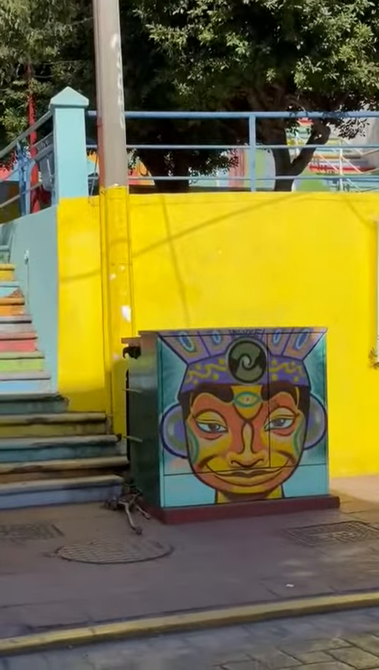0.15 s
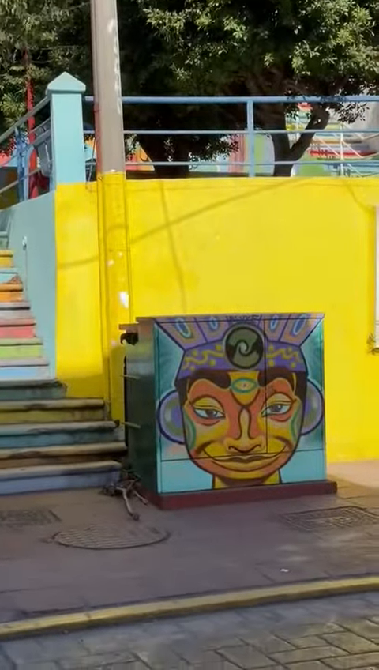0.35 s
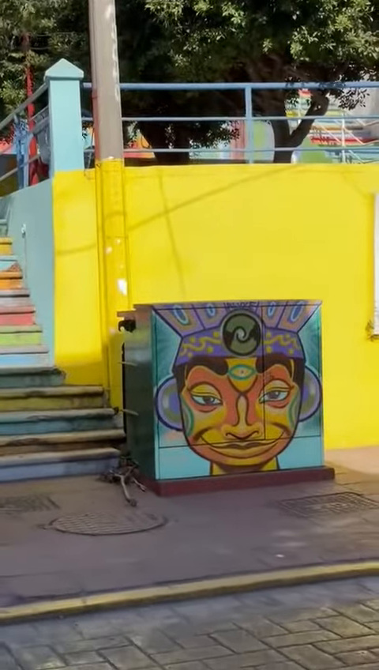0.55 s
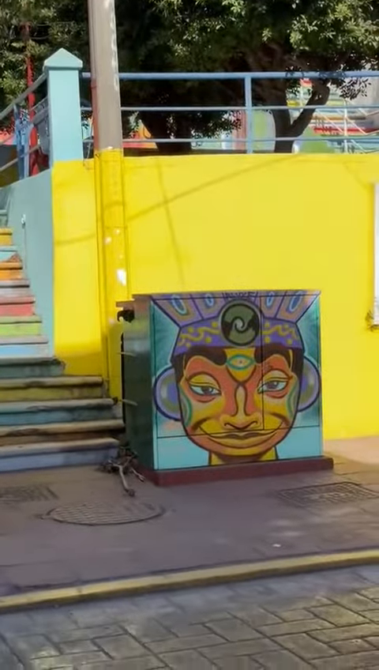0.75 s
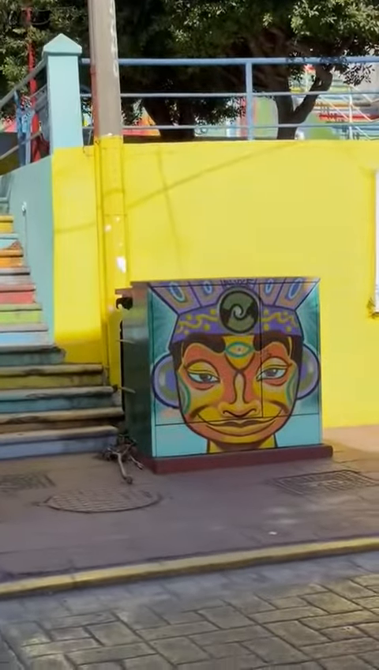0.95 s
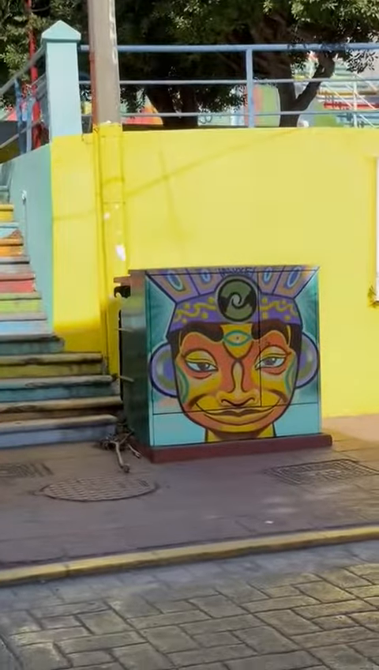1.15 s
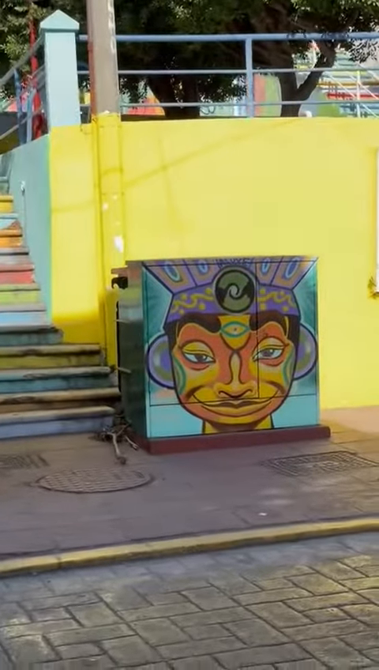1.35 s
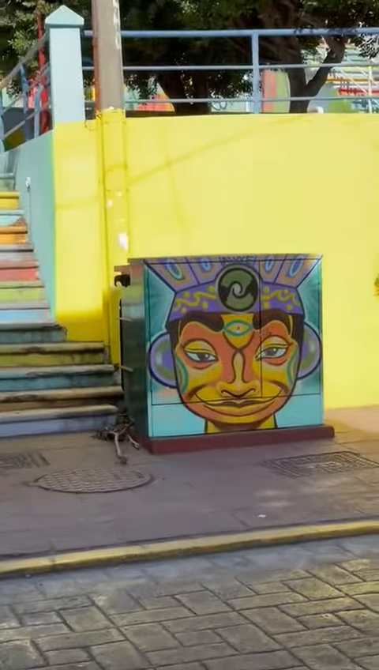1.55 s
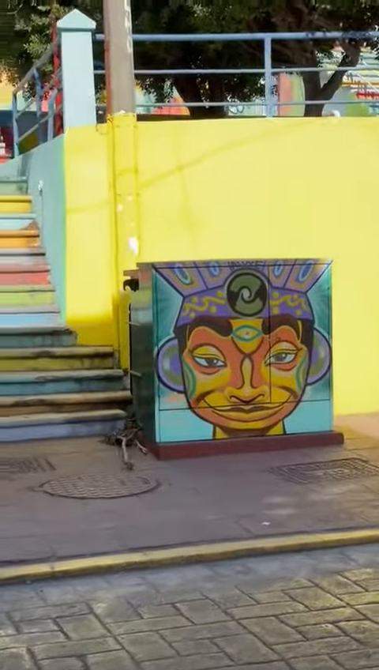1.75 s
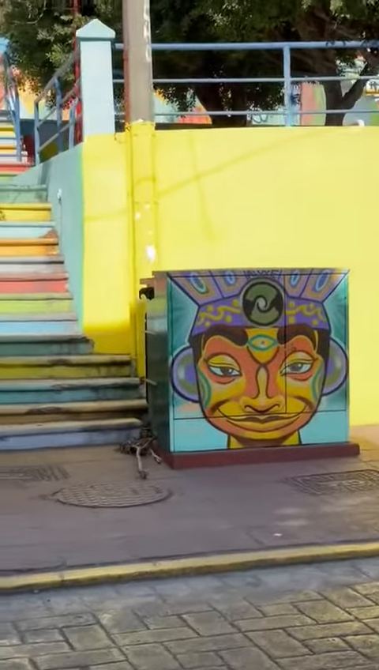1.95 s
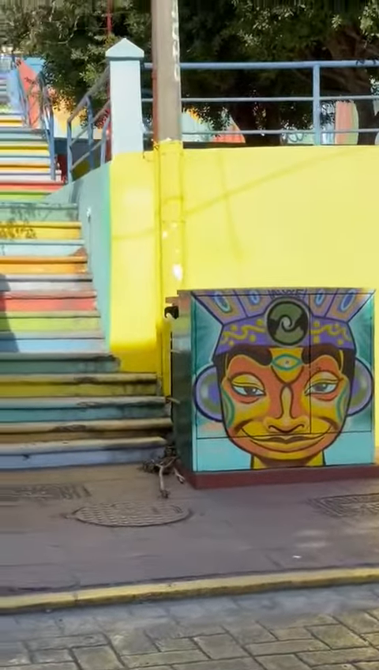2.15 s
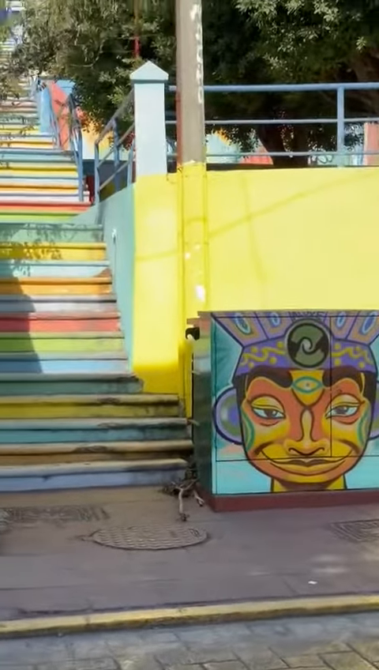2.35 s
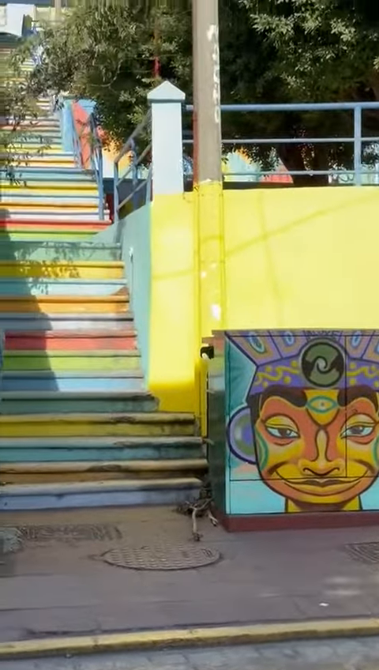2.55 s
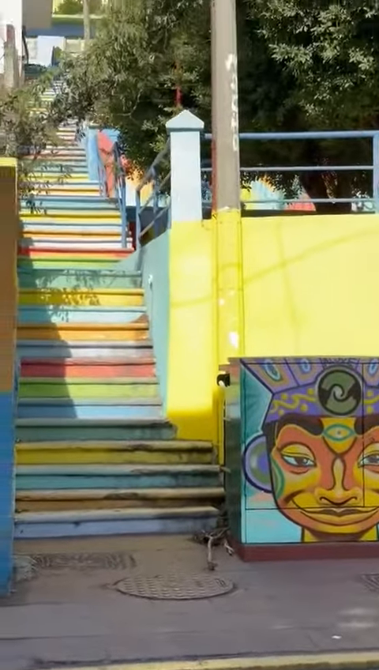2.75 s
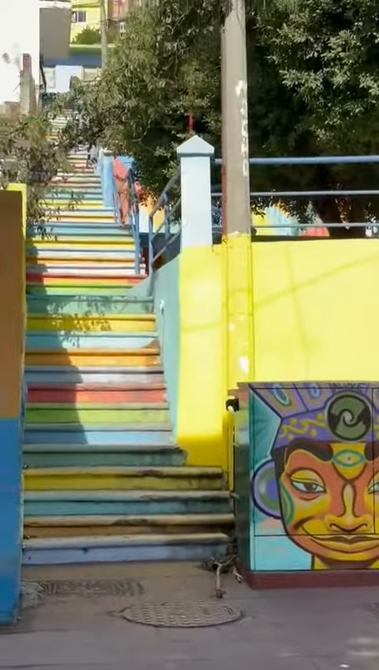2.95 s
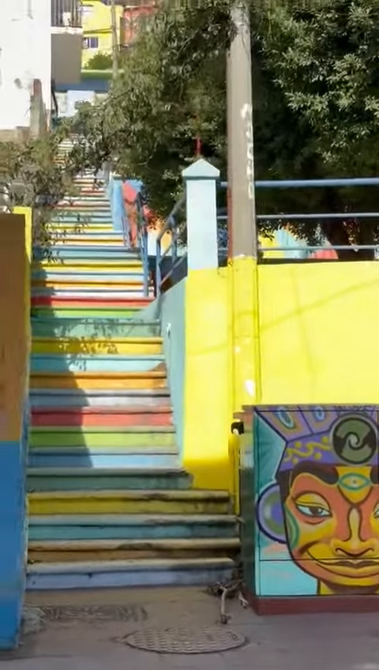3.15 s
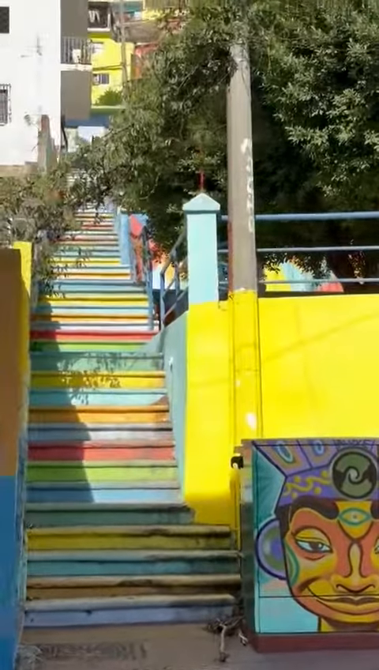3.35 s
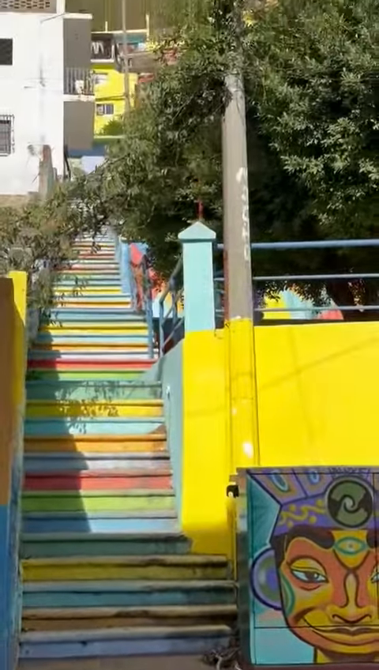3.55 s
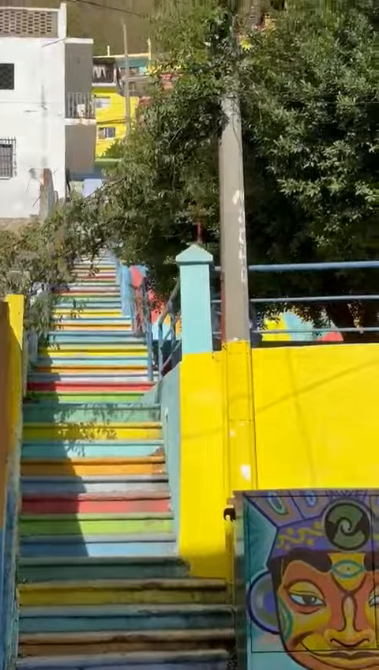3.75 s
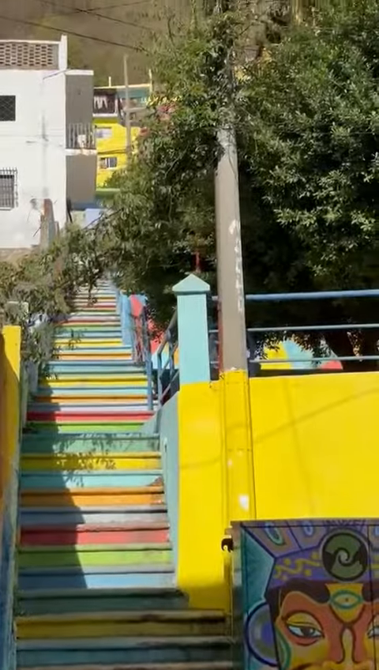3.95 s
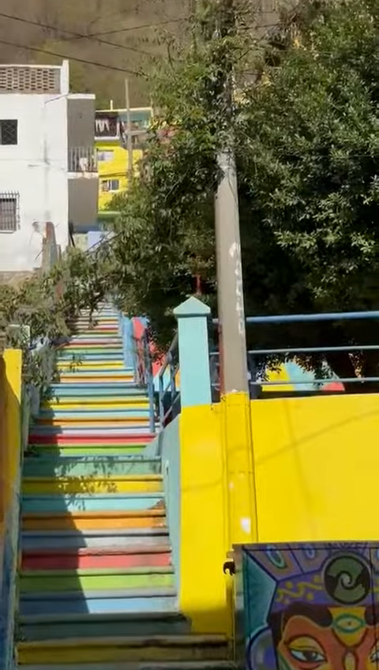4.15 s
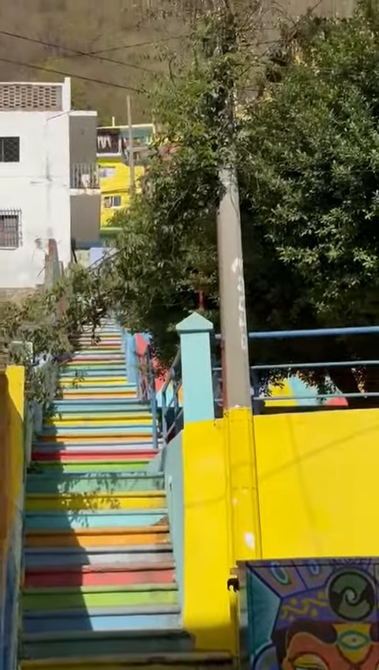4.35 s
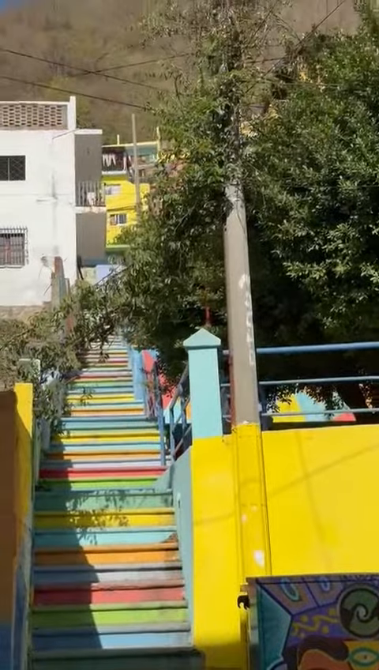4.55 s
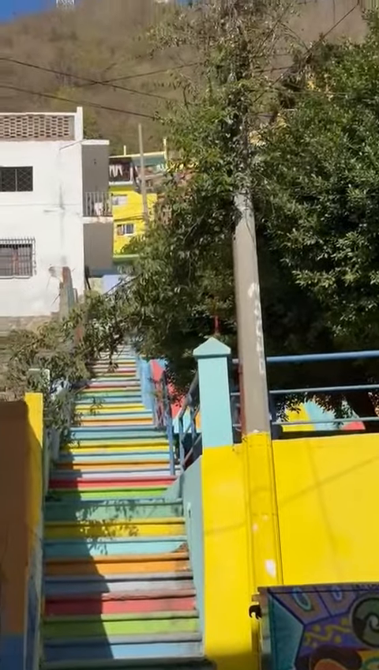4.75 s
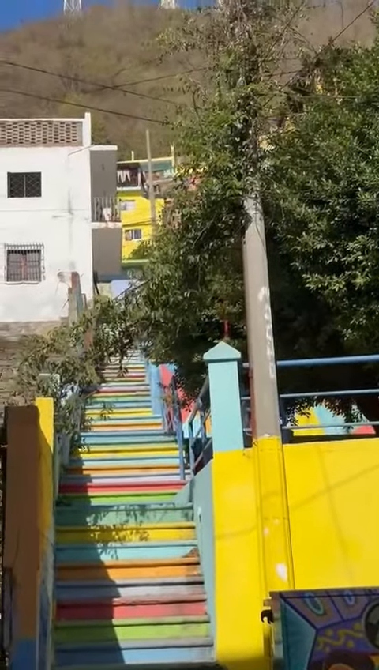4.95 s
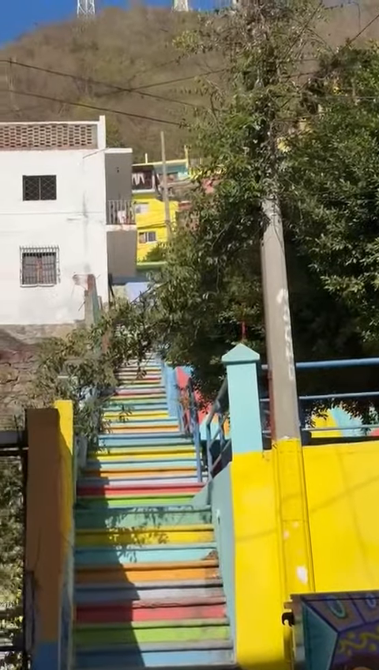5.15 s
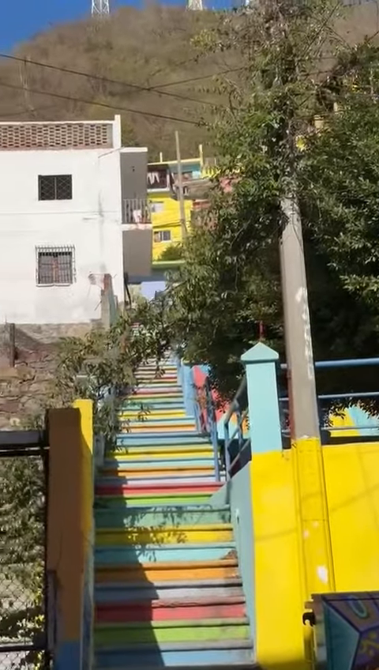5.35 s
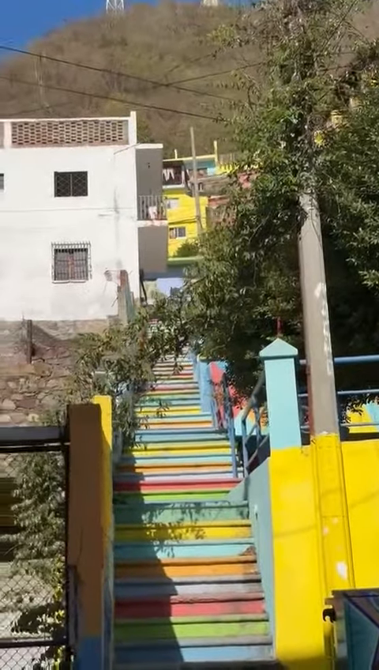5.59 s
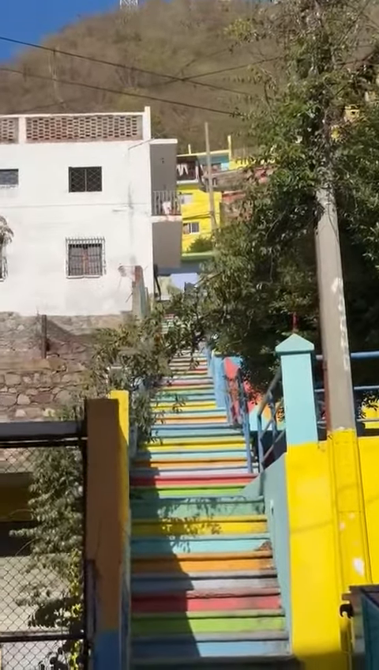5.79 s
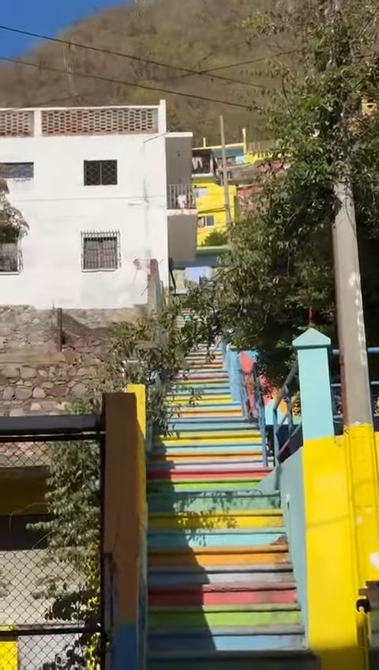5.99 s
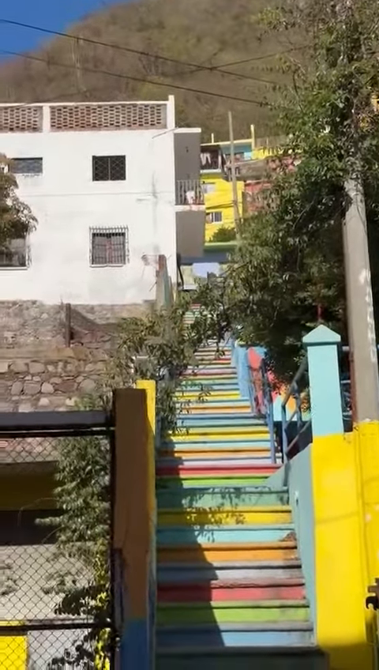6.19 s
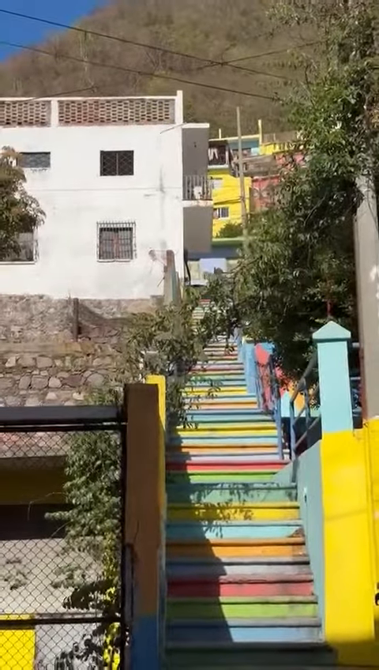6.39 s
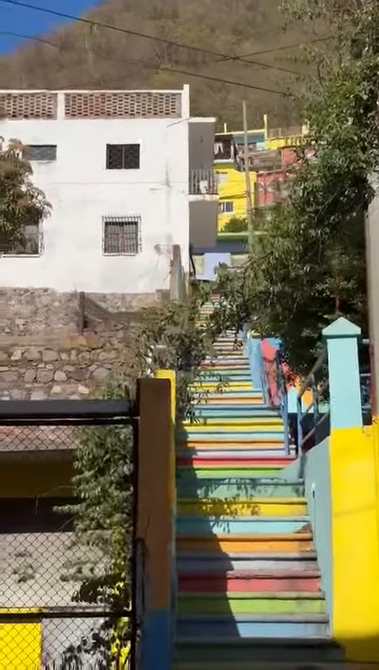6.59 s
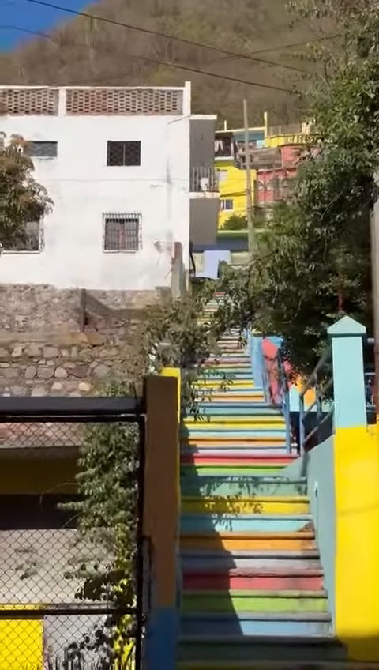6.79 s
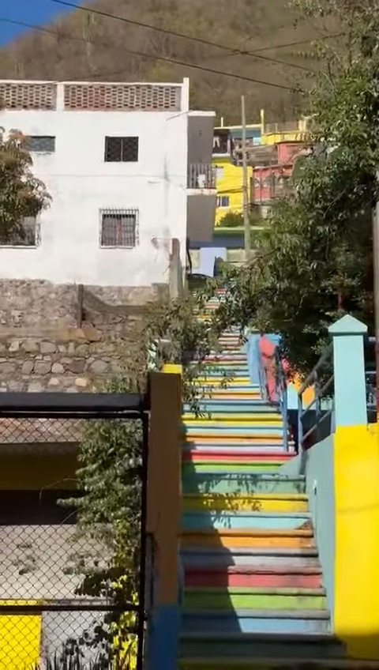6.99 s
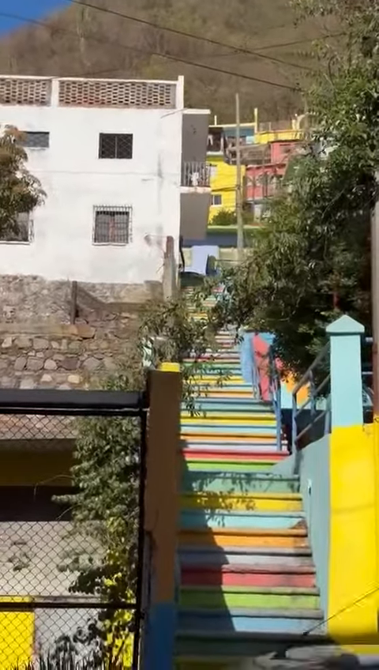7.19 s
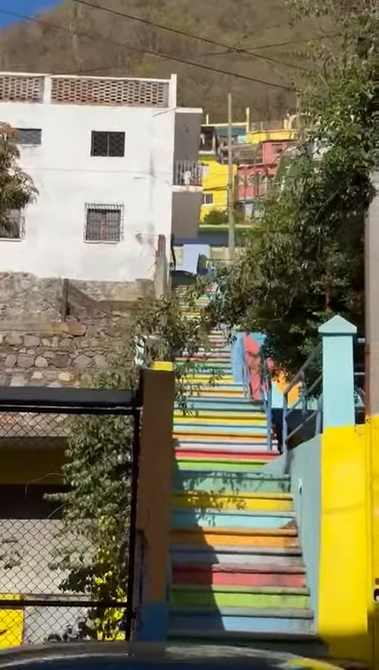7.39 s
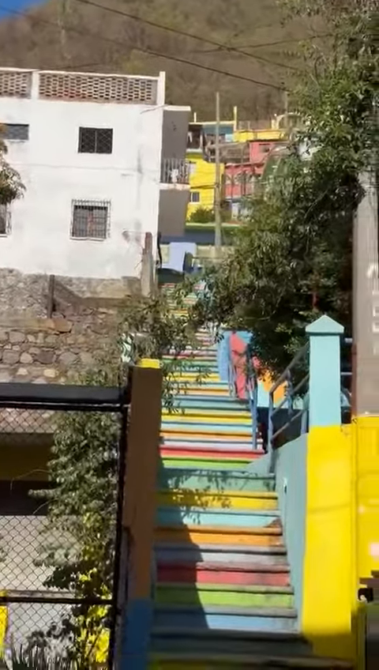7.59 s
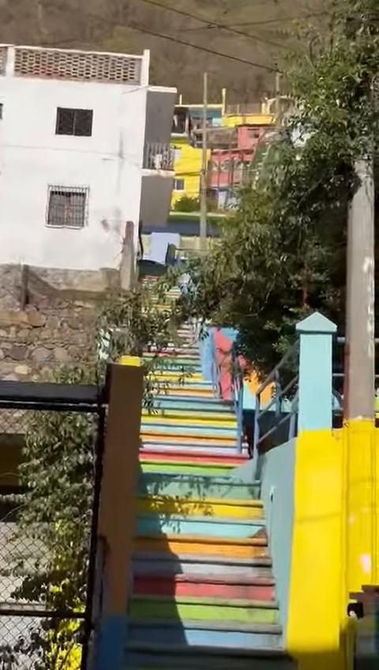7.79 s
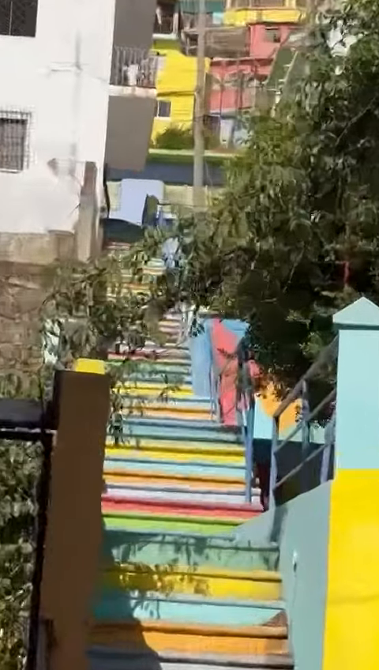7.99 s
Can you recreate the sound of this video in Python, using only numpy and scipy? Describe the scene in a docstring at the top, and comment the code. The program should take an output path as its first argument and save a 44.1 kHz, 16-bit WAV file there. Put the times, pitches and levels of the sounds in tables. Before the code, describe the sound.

Tyre noise grows from a soft, distant wash into a close, rough pass over block paving. Early on come tiny bird notes, a brief leaf rustle, a wavering low engine drone and one sharp tick. Then the car arrives: deep rumble, hiss, a body hum and dense popping slaps about thirty-four a second, moving from right to left. The level drops a little at the end. Open street, stereo roadside microphone, treble slightly dulled.

```python
"""Car passing on paving blocks

A car rolls up a street of paving blocks and passes: tyre noise throbs at the joint rate, the tread sings,
slaps ring like squeezed air and the body drums at multiples of the joint rate. The rush is shaped noise.
A distant engine drone and surges, a hum and two faint fading lines near 10 kHz are unsteady sines. Birds
are short swelling tones, leaves a patchy noise, grit ticks one damped cycle and a spit of noise."""
import sys
import numpy as np
from scipy import signal
from scipy.fft import rfft, irfft, next_fast_len
from scipy.io import wavfile
from scipy.ndimage import uniform_filter1d, map_coordinates

SR = 44100
rng = np.random.default_rng(int(sys.argv[2]) if len(sys.argv) > 2 else 0)


def output_pcm(signal):
    """Save a mono or channel-first signal as 16-bit PCM at the path in sys.argv[1].

    Samples are clipped to [-1, 1] before scaling.
    """
    pcm = np.clip(np.atleast_2d(signal).T, -1, 1) * 32767
    wavfile.write(sys.argv[1], SR, np.round(pcm).astype(np.int16))


def undo_db(level):
    """Turn decibels back into plain size, where 20 dB means ten times bigger."""
    steps = np.asarray(level, float) / 20
    return 10 ** steps


N = 354123

# paving joints crossed so far: t/s, count
JOINTS = [(0, 0), (6.811, 232), (7.108, 242), (8.05, 273)]
# louder slaps on the joints: t/s, level/dB, ring f/Hz
SLAPS = [(5.641, -24, 1100), (5.701, -21, 1000), (5.817, -26, 1084), (5.876, -23.5, 818),
         (6.019, -19, 1060), (6.049, -19.5, 860), (6.108, -19, 973), (6.194, -15, 832), (6.224, -18, 970),
         (6.283, -15.5, 942), (6.315, -19.5, 860), (6.343, -23.5, 885), (6.37, -18, 1080),
         (6.457, -19.5, 994), (6.664, -20, 840), (6.722, -19, 850), (6.754, -21.5, 887), (6.811, -12, 910),
         (6.843, -11, 877), (6.904, -18.5, 840), (6.93, -12, 908), (6.987, -23, 970), (7.108, -10, 1023),
         (7.208, -16, 900), (7.262, -17, 890), (7.292, -21.5, 1190), (7.319, -22, 870), (7.382, -21, 810),
         (7.442, -24, 880), (7.472, -18, 1040), (7.561, -19, 950), (7.805, -20, 1204), (7.835, -23.5, 1174),
         (7.894, -27, 1180)]
SOFT_DB = -28  # slap level of a plain joint at the closest moment


def unit(x):
    """Scaled to rms 1."""
    return x / np.sqrt(np.mean(x ** 2) + 1e-20)


def along(points, hz):
    """(Hz, value) points interpolated on a log frequency axis."""
    f, v = np.transpose(points)
    return np.interp(np.log(hz + 1), np.log(f + 1), v)


def curves(rows, outside=None):
    """One value per sample for each column after the time; outside replaces values beyond the ends."""
    s, *cols = np.transpose(rows)
    return [np.interp(np.arange(N) / SR, s, c, outside, outside) for c in cols]


def wobble(rate):
    """A smooth random curve, rate knots a second."""
    knots = rng.standard_normal(int(N * rate / SR) + 4)
    return map_coordinates(knots, [np.arange(N) * rate / SR])


def filtered(x, response):
    """x times a complex response of frequency."""
    m = next_fast_len(N + 8192)
    return irfft(rfft(x, m) * response(np.fft.rfftfreq(m, 1 / SR)), m)[..., :N]


def rush(spectrum, patchy_db, gate=1):
    """Coloured noise of rms 1 with patches of random gain in time and frequency."""
    z = signal.stft(rng.standard_normal(N) * gate, nperseg=512)[2]
    field = uniform_filter1d(rng.standard_normal(z.shape), size=6, axis=0)
    field = uniform_filter1d(field, size=12, axis=1)
    noise = signal.istft(z * undo_db(patchy_db * unit(field)), nperseg=512)[1][:N]
    return unit(filtered(noise, lambda hz: undo_db(along(spectrum, hz))))


def tone(hz, db, waver_hz, rate):
    """A sine whose pitch wavers at random; db is its rms."""
    phase = 2 * np.pi * np.cumsum(hz + waver_hz * wobble(rate)) / SR
    return np.sqrt(2) * undo_db(db) * np.sin(phase)


def swell(s, length, lean):
    """An arch from 0 to 1 and back; lean under 1 brings the top forward."""
    return np.sin(np.pi * np.clip((np.arange(N) / SR - s) / length, 0, 1) ** lean)


def add(track, s, sound):
    """Mixes a short sound in at time s."""
    part = track[..., round(s * SR):][..., :sound.shape[-1]]
    part += sound[..., :part.shape[-1]]


def distance_db(s):
    """Spreading loss of the passing car against its closest moment."""
    pass_s, pass_width_s = 7.08, 0.8  # closest moment; distance over speed
    return -10 * np.log10(1 + ((s - pass_s) / pass_width_s) ** 2)


def street(x, wet_db):
    """The sound plus its diffuse return from the house fronts, as exponentially decaying noise."""
    street_t60_s = .85
    t = np.arange(SR // 2) / SR
    tail = rng.standard_normal(len(t)) * undo_db(-60 * t / street_t60_s) * (t > .008)
    return x + undo_db(wet_db) * signal.fftconvolve(x, tail / np.linalg.norm(tail))[:N]


def patter(count):
    """Tread blocks meet rough stone at random: small pops ring a few cycles near 1 kHz; rms 1."""
    at, pitch, size = rng.random(count), rng.standard_normal(count), rng.exponential(size=count)
    hz, t = 1000 * np.exp(.25 * pitch)[:, None], np.arange(SR // 80) / SR
    size_gain = undo_db(4.8 * np.minimum(size, 3.5))[:, None]
    envelope = np.exp(-hz * t / 3) * (1 - np.exp(-t / 0.00039))
    pops = size_gain * np.sin(2 * np.pi * hz * t) * envelope
    where = (at * N).astype(int)[:, None] + np.arange(len(t))
    return unit(np.bincount(where.ravel(), pops.ravel())[:N])


def traffic():
    """Deep bass, rumble, body noise, roar and hiss; roar and hiss throb per joint at random strength."""
    # noise spectra, relative: f/Hz, density/dB per Hz
    deep_spectrum = [(12, -43), (20, -19.5), (43, -10), (62, -0.5), (81, -35), (140, -120)]
    rumble_spectrum = [(36, -28), (62, -1.5), (92, 6), (124, -6), (135, -5.5), (180, -43), (300, -120)]
    body_spectrum = [(71, -32), (120, -5.5), (231, -2), (273, -7.5), (328, -12), (520, -24.5), (680, -35.5),
                     (1140, -120)]
    roar_spectrum = [(260, -26.5), (450, -8.5), (508, -8.5), (699, -4), (860, -2), (1050, 0.5), (1420, -10),
                     (1600, -19), (2080, -32), (3520, -120)]
    hiss_spectrum = [(1200, -120), (1450, 2), (1950, -1), (2500, -6.5), (3200, -11.5), (4500, -16.5),
                     (6500, -16.5), (8000, -17), (9000, -19), (10300, -19.5), (11300, -17.5),
                     (12100, -49.5)]
    # echo from walls left and right: f/Hz, density/dB per Hz
    echo_spectrum = [(18, -42), (30, -16.5), (75, -26), (193, -24), (265, -6.5), (345, -4.5), (638, 1.5),
                     (1010, 1.5), (1160, -4.5), (2000, -38), (2600, -71.5), (4400, -120)]
    # car before distance colour: t/s, tyre roar level/dB, body noise level/dB
    car_levels = [(0, -47, -46.5), (0.89, -48, -46.5), (1.36, -48, -43.5), (2.21, -47, -43.5),
                  (2.73, -48.5, -41), (3.31, -45, -42), (3.71, -43, -40.5), (4.36, -41.5, -39),
                  (4.79, -42, -40), (5.39, -40.5, -38), (5.93, -37, -34.5), (6.17, -34, -32.5),
                  (6.45, -34, -32), (6.89, -32, -30.5), (7.5, -33, -31.5), (8.03, -37, -32.5)]
    # deepest bass before distance colour: t/s, level/dB
    deep_levels = [(0, -49.5), (1.8, -48.5), (3, -45.5), (3.8, -52.5), (4.8, -43.5), (5.5, -39), (6.5, -40),
                   (7.3, -47.5), (8.03, -37)]
    # wall echo relative to the roar: t/s, level/dB
    echo_levels = [(0, -14), (1.5, -15), (2.4, -7.5), (3.3, -9.5), (5.4, -13.5), (6.4, -20), (7, -19.5),
                   (8.03, -10)]
    # share of sound without distance colour: t/s, nearness/0-1
    nearness = [(0, 0.2), (1.5, 0.37), (2.8, 0.65), (5, 0.56), (6.5, 0.64), (8.03, 0.63)]
    # colour that distance adds: f/Hz, gain/dB
    far_colour = [(40, 8), (90, 0), (150, 2.5), (220, -6), (380, 9), (650, 1.5), (1000, -5), (2000, -3.5),
                  (4500, 3), (8000, -6.5)]
    reference_db = -33  # of roar and body noise
    hiss_at_reference_db, hiss_db_per_roar_db = -43, 0.79
    rumble_at_reference_db, rumble_db_per_body_db, rumble_waver_db = -33, 0.71, 3.5

    roar_db, body_db = curves(car_levels)
    hiss_db = hiss_at_reference_db + hiss_db_per_roar_db * (roar_db - reference_db)
    rumble_db = rumble_at_reference_db + rumble_db_per_body_db * (body_db - reference_db)
    rumble_db = rumble_db + rumble_waver_db * wobble(2.47)
    near = np.clip(curves(nearness)[0], 0, 1)

    joints = curves(JOINTS)[0]
    strength = undo_db(4.7 * rng.standard_normal(int(joints[-1]) + 1))[joints.astype(int)]
    throb = strength * np.exp(-3.2 * (joints % 1))

    front = undo_db(curves(deep_levels)[0]) * rush(deep_spectrum, patchy_db=0.7)
    front += undo_db(rumble_db) * rush(rumble_spectrum, patchy_db=0.56)
    front += undo_db(body_db) * rush(body_spectrum, patchy_db=1.1)
    front += undo_db(roar_db) * rush(roar_spectrum, patchy_db=1.54, gate=1 + 0.3 * throb)
    front += undo_db(hiss_db + 0.52 * wobble(9)) * rush(hiss_spectrum, patchy_db=1.18, gate=1 + 0.2 * throb)
    front += undo_db(roar_db - 6.5) * near * patter(count=2400)
    far = filtered(front, lambda hz: undo_db(along(far_colour, hz)))
    front = near * front + (1 - near) * far

    echo_db = roar_db + curves(echo_levels)[0]
    sides = undo_db(echo_db) * rush(echo_spectrum, patchy_db=1.1, gate=1 + .4 * throb)
    return front + sides * [[1], [-1]]  # echo in opposite polarity left and right


def hum():
    """A held line that slowly sags in pitch, unsteady in level and frequency."""
    # t/s, level/dB
    hum_levels = [(0, -61), (.8, -54.5), (2, -46), (3, -57), (3.6, -47.5), (5, -49.5), (5.9, -43.5),
                  (6.7, -40), (8.03, -48)]
    start_hz, sag_hz_per_s = 280, 1.2
    hz = start_hz - sag_hz_per_s * np.arange(N) / SR
    return tone(hz, curves(hum_levels)[0] + 3 * wobble(6), waver_hz=2.43, rate=13)


def treble_lines():
    """Two faint wavering lines near 10 kHz that fade together."""
    # t/s, level/dB of each line
    line_levels = [(0, -66), (1, -69.5), (2, -75.5), (3.3, -78), (3.6, -110)]
    # line f/Hz
    line_hz = [9920, 10130]
    return sum(tone(hz, curves(line_levels)[0] + 2.5 * wobble(15), waver_hz=18, rate=40)
               for hz in line_hz)


def surges():
    """Engine tones that swell and pass, each a wavering sine under an arch."""
    # start t/s, length/s, f/Hz, level/dB at the top
    surge_rows = [(6.9, 0.88, 99, -34.5), (1.57, 0.67, 254, -46.5), (0, 0.48, 188, -49),
                  (5.5, 0.52, 75, -43)]
    return sum(swell(s, length, lean=.55) * tone(hz, db, waver_hz=2.27, rate=8)
               for s, length, hz, db in surge_rows)


def birds():
    """Short rough notes, quick to rise, and two gliding chirps, far off among the houses."""
    # gliding chirps: start t/s, length/s, first f/Hz, last f/Hz, level/dB
    chirp_rows = [(2.222, .048, 4950, 3250, -61), (2.298, .035, 3300, 3850, -66)]
    # level notes: start t/s, length/s, f/Hz, level/dB
    note_rows = [(0.068, 0.062, 4336, -49), (0.119, .04, 4200, -56), (0.211, 0.054, 4340, -54),
                 (.25, .07, 4200, -68), (0.17, 0.072, 3880, -62), (.29, 0.088, 3860, -67),
                 (1.43, 0.11, 3570, -68), (1.533, .12, 3690, -63), (1.7, .1, 5160, -70),
                 (3.577, 0.21, 4280, -63.5), (5.17, 0.13, 4070, -63), (5.192, .16, 4430, -65)]
    t, out = np.arange(N) / SR, 0
    for s, length, first, last, db in chirp_rows:
        progress = np.clip((t - s) / length, 0, 1) ** 1.4  # glide steepest past the middle
        glide = first + (last - first) * np.sin(np.pi / 2 * progress) ** 2
        chirp = tone(glide, db + 2.5 * wobble(70), waver_hz=40, rate=90)
        out = out + swell(s, length, lean=1.4) ** .6 * chirp
    for s, length, hz, db in note_rows:
        note = tone(hz, db + 2.5 * wobble(45), waver_hz=24.7, rate=60)
        out = out + swell(s, length, lean=0.59) ** 1.2 * note
    return street(out, wet_db=-6.5)


def drone():
    """A distant engine: one low line of wandering pitch and level."""
    # t/s, f/Hz, level/dB
    drone_rows = [(0.7, 99, -60), (0.85, 96.04, -44), (1.57, 92.5, -37), (1.99, 101.8, -34),
                  (2.33, 93.7, -31), (2.42, 88.8, -50), (2.62, 92.8, -40), (2.75, 99.1, -35.5),
                  (3.1, 99.5, -48)]
    hz = curves(drone_rows)[0]
    db = curves(drone_rows, outside=-120)[1] + 0.53 * wobble(9.8)
    return tone(hz, db, waver_hz=3.2, rate=11)


def ticks():
    """A grit tick is barely more than one cycle, with a decaying spit of noise."""
    # t/s, level/dB, f/Hz, spit t60/s
    tick_rows = [(1.232, -32.5, 7000, 0.053), (2.0564, -18.5, 2030, 0.0089), (2.068, -40.5, 2007, 0.0091),
                 (3.16, -42, 9000, .04), (3.446, -32, 5380, 0.024), (3.664, -43, 8500, 0.033),
                 (3.77, -40, 6000, .015), (3.903, -27, 6940, 0.023), (3.925, -44.5, 6000, 0.011),
                 (4.47, -52, 8000, .03), (4.961, -30, 6500, 0.071), (4.99, -32, 8726, .05),
                 (6.41, -32.5, 3000, 0.0082), (6.469, -43, 8000, 0.027)]
    out, t = np.zeros(N), np.arange(SR // 20) / SR
    chance = rng.standard_normal((len(tick_rows), len(t)))
    for (s, db, hz, t60_s), grit in zip(tick_rows, chance):
        snap = np.sin(2 * np.pi * hz * t) * np.exp(-1.4 * hz * t)
        spit = 0.16 * grit * undo_db(-60 * t / t60_s)
        add(out, s, undo_db(db) * (snap + spit))
    thinned = filtered(out, lambda hz: hz ** 4 / (hz ** 4 + 1300 ** 4))  # high-pass
    return street(thinned, wet_db=-9.5)


def leaves():
    """Leaves in a gust: a brief patchy rustle of noise."""
    # t/s, level/dB
    rustle_levels = [(1.35, -85), (1.5, -61.5), (1.8, -62), (2.05, -63.5), (2.3, -89)]
    # relative spectrum: f/Hz, density/dB per Hz
    leaf_spectrum = [(2500, -43.5), (3500, -1.5), (5000, -5.5), (7000, -9.5), (9000, -25.5)]
    db = curves(rustle_levels, outside=-120)[0] + 1.6 * wobble(20)
    return undo_db(db) * rush(leaf_spectrum, patchy_db=0.5)


def singing():
    """On the approach the tread sings in a narrow fluttering band."""
    # relative spectrum: f/Hz, density/dB per Hz
    sing_spectrum = [(850, -45), (1000, -8.5), (1090, 4), (1190, -9), (1350, -40.5)]
    start_s, length_s, top_db, flutter_db = 2.17, 3.8, -51.5, 5.7
    flutter = undo_db(top_db + flutter_db * wobble(9.6))
    return swell(start_s, length_s, lean=0.9) * flutter * rush(sing_spectrum, patchy_db=0.0)


def drumming():
    """The car body is shaken at two and three times the joint rate."""
    # drumming at three times the rate: t/s, level/dB
    third_levels = [(5.5, -52), (6.2, -47), (6.4, -34.5), (6.8, -30), (7.1, -44), (7.5, -43), (7.65, -26),
                    (7.8, -44), (8.03, -39)]
    second_closest_db, second_db_per_distance_db = -30.5, 5.5
    rate_hz = np.gradient(curves(JOINTS)[0]) * SR
    second_db = second_closest_db + second_db_per_distance_db * distance_db(np.arange(N) / SR)
    third_db = curves(third_levels, outside=-120)[0]
    return (tone(2 * rate_hz, second_db, waver_hz=0.9, rate=6)
            + tone(3 * rate_hz, third_db, waver_hz=1.585, rate=5.6))


def plain_joints():
    """Rows like those of SLAPS for all other joints: softer, with size and pitch left to chance."""
    from_s, typical_hz = 5.6, 910  # joints before from_s are left out
    when, count = np.transpose(JOINTS)
    s = np.interp(np.arange(count[-1]), count, when)
    gap_s = np.abs(s[:, None] - np.transpose(SLAPS)[0]).min(axis=1)
    s = s[(s > from_s) & (gap_s > .012)]
    luck = rng.standard_normal((len(s), 2))
    return np.c_[s, SOFT_DB + distance_db(s) + 3 * luck[:, 0], typical_hz * np.exp(.1 * luck[:, 1])]


def slaps():
    """Each slap cracks; air squeezed under the tread swells, rings a few cycles; the kerb repeats it."""
    pan_db, centre_s, cross_s, pan_scatter_db = 2.5, 6.75, 0.51, 1.7  # left over right: crosses right to left
    crack_closest_db, crack_scatter_db = -32.5, 1.5
    crack_db_per_distance_db, crack_db_per_slap_db = 2, .5
    out, t = np.zeros((2, N)), np.arange(SR // 20) / SR
    rows = np.r_[SLAPS, plain_joints()]
    chance = rng.standard_normal((len(rows), len(t) + 3))
    for (s, db, hz), grit, luck in zip(rows, chance[:, 3:], chance[:, :3]):
        left_db = pan_db * np.tanh((s - centre_s) / cross_s) + pan_scatter_db * luck[0]
        crack_db = crack_closest_db + crack_db_per_distance_db * distance_db(s)
        crack_db += crack_db_per_slap_db * (db - SOFT_DB) + crack_scatter_db * luck[1]
        # random phase steps roughen ring and crack
        ring = np.sin(2 * np.pi * hz * t + 0.034 * np.cumsum(grit[::-1]))
        ring *= undo_db(-60 * t / 0.026) * (1 - np.exp(-(t / 0.0014) ** 2))
        ring += 0.4 * np.roll(ring, round(0.0081 * SR))  # kerb
        crack_hz = 1900 * np.exp(.2 * luck[2])
        crack = np.sin(2 * np.pi * crack_hz * t + 0.19 * np.cumsum(grit)) * undo_db(crack_db - 60 * t / 0.014)
        panned = undo_db(db + 4.0) * ring * undo_db([[left_db / 2], [-left_db / 2]])  # +4 dB offsets the slow swell
        add(out, s - .0012, panned + crack)
    return out


def scene():
    """All sources lie roughly ahead."""
    steady = hum() + treble_lines() + surges() + birds() + drone()
    return traffic() + steady + ticks() + leaves() + singing() + drumming() + slaps()


def top_cut(x):
    """Nothing passes above the cut-off."""
    return signal.sosfilt(signal.butter(12, 11900, fs=SR, output="sos"), x)


def record(dry):
    """In the treble the two microphone ports hear the sound ever further out of phase."""
    # f/Hz, phase by which left leads/rad
    port_phase = [(0, 0), (5800, 0), (7900, -1.7), (8900, -2.45), (9600, -2.75), (10000, -2.6),
                  (10300, -2.75), (10600, -3.14)]
    hz, lead_rad = np.transpose(port_phase)
    ports = filtered(dry, lambda f: np.exp(.5j * np.interp(f, hz, lead_rad) * [[1], [-1]]))
    return top_cut(ports)


dry = scene()
out = record(dry)
output_pcm(out)
```